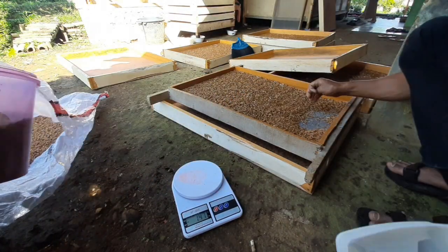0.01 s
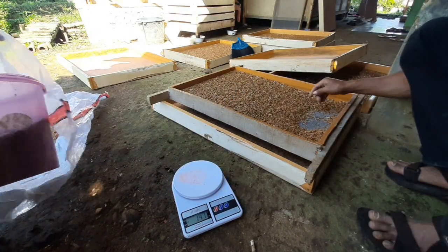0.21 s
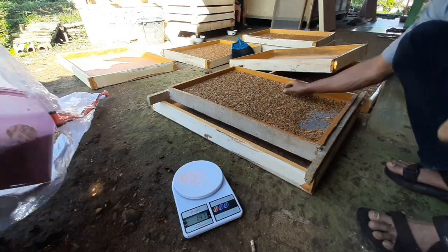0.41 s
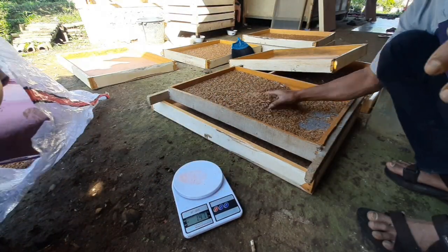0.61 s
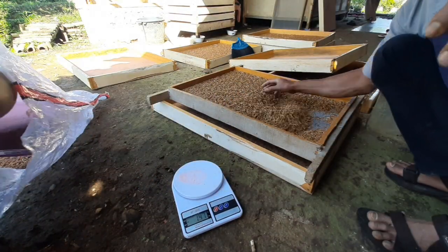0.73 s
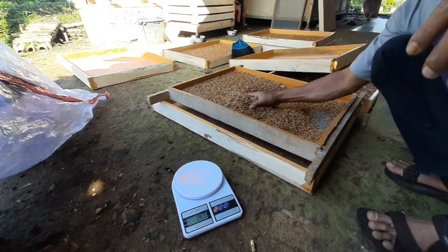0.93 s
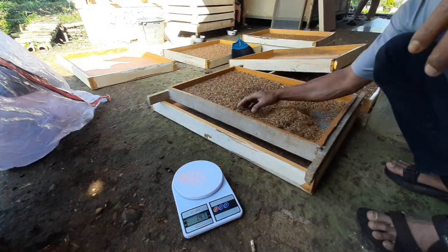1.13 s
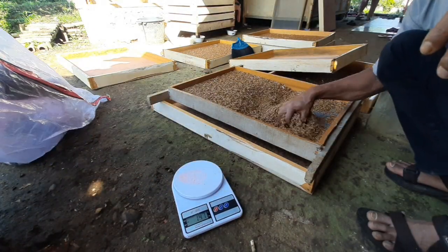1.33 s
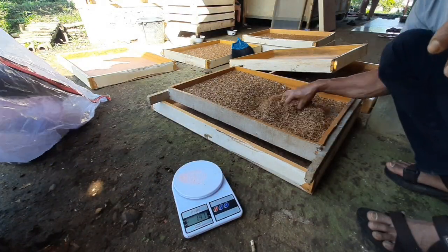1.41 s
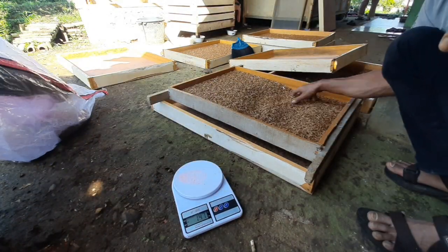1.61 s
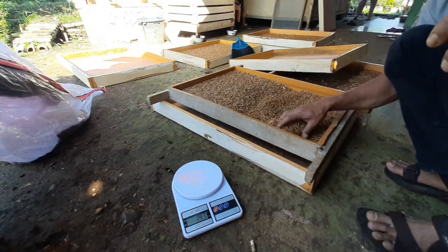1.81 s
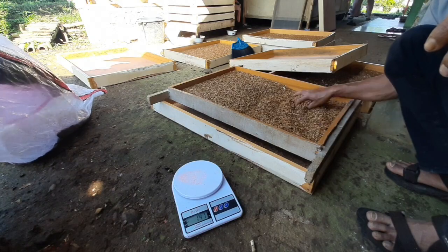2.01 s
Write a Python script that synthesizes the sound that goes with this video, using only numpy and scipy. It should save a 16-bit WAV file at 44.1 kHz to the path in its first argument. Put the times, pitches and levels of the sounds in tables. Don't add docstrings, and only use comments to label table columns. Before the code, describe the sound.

A plastic jug knocks hollowly on a bucket, then a hand rakes small worms in a tray

```python
import sys
import numpy as np
from scipy import signal
from scipy.fft import rfft, irfft
from scipy.io import wavfile
from scipy.ndimage import uniform_filter1d

SR = 44100
rng = np.random.default_rng(int(sys.argv[2]) if len(sys.argv) > 2 else 0)


def nominal_scale(level):
    x = np.asarray(level, float) / 20
    return 10 ** x


def waveform_to_disk(signal):
    frames = np.transpose(np.atleast_2d(signal))
    scaled = np.clip(frames, -1, 1) * 32767
    samples = np.round(scaled).astype(np.int16)
    wavfile.write(sys.argv[1], SR, samples)


N = 92610

# mode in Hz, level in dB, t60 in s, side of the blow [+-1].
BUCKET = [(194, -7, 0.086, 1), (284, 5.5, 0.068, 1), (401, 4, 0.094, -1), (450.5, 17.5, .065, 1),
          (513, 6.5, 0.12, 1), (606, 0.5, 0.046, -1)]
# mode in Hz, level in dB, t60 in s, side of the blow [+-1].
RIM = [(768, -11.5, 0.07, 1), (865, -19, .025, -1), (988, -11, 0.046, 1), (1141, -5, 0.035, -1),
       (1310, -19, .02, 1), (1443, -2, 0.024, 1), (1783, -8, 0.037, -1), (2140, -15, .03, 1),
       (2390, -14, .03, 1), (2950, -15, 0.03, -1), (3360, -9, 0.017, 1)]
# time in s, speed as hiss in dB, pressure on the tray in dB.
RAKE = [(0, -52.5, -44), (.15, -51, -50.5), (.3, -58.5, -39), (.345, -61, -52), (.5, -58.5, -53.5),
        (0.659, -54.5, -49), (.795, -63, -91), (.805, -85, -89), (.935, -74, -66), (.97, -58.5, -54),
        (1.1, -55, -55.5), (1.23, -47, -46), (1.29, -51, -52), (1.38, -52.5, -49), (1.644, -47.5, -48),
        (1.662, -53, -61), (1.76, -60.5, -51), (2.1, -56, -52.5)]


def evened(x):
    return x / np.sqrt(np.mean(x ** 2) + 1e-20)


def read(points, hz):
    f, value = np.transpose(points)
    return np.interp(np.log(hz + 1), np.log(f + 1), value)


def shaped(x, gain):
    return irfft(rfft(x) * gain(np.fft.rfftfreq(N, 1 / SR)), N)


def add(mix, s, sound):
    part = mix[..., round(s * SR):][..., :sound.shape[-1]]
    part += sound[..., :part.shape[-1]]


def resonate(x, hz, width):
    r = np.exp(-np.pi * width / SR)
    return evened(signal.lfilter([1, 0, -1], [1, -2 * r * np.cos(2 * np.pi * hz / SR), r * r], x))


def burst(t, start, length):
    rise, fall = 0.1, 0.22
    u = (t - start) / length
    return np.clip(u / rise, 0, 1) * np.clip((1 + fall - u) / (2 * fall), 0, 1) ** 2


def ring(modes, pitch, t):
    return sum(side * nominal_scale(db - 60 * t / t60) * np.sin(2 * np.pi * hz * pitch * t)
               for hz, db, t60, side in modes)


def contact(t):
    crack_db, crack_t60, snap_db, snap_ms = -14, 0.015, 3, 0.05
    noise = signal.lfilter([1], [1, -0.6], rng.standard_normal(len(t)))
    crack = nominal_scale(crack_db - 60 * t / crack_t60) * evened(noise)
    since = t * 1000 - 0.4
    snap = (1 - since / snap_ms) * np.exp(-np.maximum(since, 0) / snap_ms) * (since > 0)
    return crack + nominal_scale(snap_db) * snap


def knock(hollow, walls, db, wall_db, pitch, hard_hz):
    blow_ms, smear_db, wobble_db = 5.5, -8, -19
    t = np.arange(int(0.3 * SR)) / SR
    noise = rng.standard_normal((2, len(t)))
    rough = 1 + nominal_scale(smear_db) * evened(uniform_filter1d(noise[0], size=60))
    wobble = 1 + nominal_scale(wobble_db) * evened(uniform_filter1d(noise[1], size=300))
    swell = np.sin(np.pi / 2 * np.minimum(t * 1000 / blow_ms, 1)) ** 2
    wall = (rough * ring(walls, pitch, t) + contact(t)) * np.minimum(t * hard_hz / 3, 1)
    wall = signal.lfilter(*signal.butter(2, min(hard_hz, 15000), fs=SR), wall)
    return nominal_scale(db) * (0.5 * swell * wobble * ring(hollow, pitch, t) + nominal_scale(wall_db) * wall)


def jug_knocks():
    # start in s, level in dB, wall in dB, pitch factor, hardness in Hz.
    blows = [(.0005, -30.5, 0, 0.89, 1800), (.007, -45.5, 7.5, 1, 1600), (.0085, -30, 5.5, 0.61, 2200),
             (.2, -32, -11, 1.02, 990), (.214, -32, 8, 1.01, 1500), (0.2224, -8, 1.5, 1, 10400),
             (.244, -42, -22, 1.02, 1200), (0.424, -47, -2, 0.88, 800), (.481, -45, -16, 0.88, 800),
             (0.516, -40, -11, 1.26, 1270), (0.527, -33.5, 9, 1, 4000), (.544, -37, 7, 1.14, 1400),
             (0.553, -40, 9, 1.19, 1190)]
    # mode in Hz, level in dB, t60 in s, side of the blow [+-1].
    jug_hollow = [(160, -6, 0.14, 1), (252, -9, 0.089, -1), (343, -3, 0.094, 1), (399.3, .5, 0.12, -1),
                  (421, 6.5, 0.024, 1), (492.4, 6, 0.12, 1), (607, 3, 0.046, -1)]
    # mode in Hz, level in dB, t60 in s, side of the blow [+-1].
    jug_wall = [(796, -20.5, 0.07, 1), (880, -32, 0.17, -1), (1002, -2.5, 0.022, 1), (1194, -8.5, 0.02, 1),
                (1400, -7, 0.011, -1), (1700, -11.5, 0.03, 1), (2044, -15, 0.022, -1), (2265, -9, 0.038, 1),
                (2600, -17, 0.013, -1), (3190, -11, 0.015, 1)]
    out = np.zeros(N)
    for s, *blow in blows:
        add(out, s, knock(jug_hollow, jug_wall, *blow))
    return out


def ground_bumps():
    # start in s, tone in Hz, level in dB, length in s.
    weight_bumps = [(0.065, 66, -42, 0.052), (0.0289, 121, -42.5, 0.043), (0.18, 117, -41.5, 0.035),
                    (0.26, 99.6, -41.5, 0.045), (.17, 145, -34, 0.079), (0.28, 170, -37, 0.04),
                    (0.35, 85, -43, 0.05), (1.41, 115, -38, 0.068), (1.49, 113, -38.5, 0.045),
                    (1.984, 230, -33.5, 0.0064), (1.84, 131, -43.5, 0.066)]
    out = np.zeros(N)
    for s, hz, db, length in weight_bumps:
        t = np.arange(0, length, 1 / SR)
        add(out, s, nominal_scale(db) * np.sin(np.pi * t / length) * np.sin(2 * np.pi * hz * t))
    return out


def rim_drags():
    # start in s, length in s, level in dB.
    drags = [
        (.08, 0.067, -48),
        (.18, .042, -36),
        (0.259, 0.033, -41),
        (.335, .055, -47),
        (.418, .037, -43),
        (.455, 0.04, -48.5),
        (.52, .045, -40),
        (0.563, 0.023, -45),
    ]
    t = np.arange(N) / SR
    noise = rng.standard_normal(N)
    rub = evened(sum(nominal_scale(db) * resonate(noise, hz, 70) for hz, db, *_ in BUCKET + RIM))
    return rub * sum(nominal_scale(db) * burst(t, s, length) for s, length, db in drags)


def rim_rocks():
    # start in s, level in dB, wall in dB, pitch factor, hardness in Hz.
    rocks = [
        (0.3024, -35.5, 4, 1.06, 2500),
        (.3088, -21.5, -1, 1, 4000),
        (0.3124, -26, 4, 1.01, 3500),
        (0.3653, -43, 7, 1.1, 1800),
    ]
    out = np.zeros(N)
    for s, *blow in rocks:
        add(out, s, knock(BUCKET, RIM, *blow))
    return out


def shed_scatter(x):
    t = np.arange(int(0.2 * SR)) / SR
    tail = rng.standard_normal((2, len(t))) * nominal_scale(-60 * t / 0.05) * (t > 0.004)
    return nominal_scale(-14) * signal.fftconvolve(x[None], tail / np.linalg.norm(tail[0]), axes=1)[:, :N]


def jug():
    # frequency in Hz, left minus right in dB.
    jug_lean = [(60, -2.5), (450, 3), (800, -3.5), (2000, 4.5), (4500, 8), (10000, 3.5)]
    lag_s = 0.0002
    near = jug_knocks() + ground_bumps() + rim_drags() + rim_rocks()

    def port(k):
        return shaped(near, lambda hz: nominal_scale(k * read(jug_lean, hz)) * np.exp(-2j * np.pi * k * hz * lag_s))

    return np.array([port(0.49), port(-0.37)]) + shed_scatter(near)


def ports(a, b):
    # frequency in Hz, left-right likeness [0 to 1].
    likeness = [(60, 1), (170, 0.43), (350, 0.36), (600, 0.091), (1200, 0.072), (8000, 0.053)]
    # frequency in Hz, left minus right in dB.
    port_lean = [(60, -2), (250, 5), (550, -0.5), (1650, 1), (4000, 2.5), (10000, 1)]
    lead_s = 0.000242
    same = lambda hz: np.clip(read(likeness, hz), 0, 1)
    left = shaped(a, lambda hz: nominal_scale(read(port_lean, hz) / 2) * np.exp(2j * np.pi * hz * lead_s))
    right = shaped(a, same) + shaped(b, lambda hz: np.sqrt(1 - same(hz) ** 2))
    return np.array([left, shaped(right, lambda hz: nominal_scale(-read(port_lean, hz) / 2))])


def grains():
    per_s, size_db, share, flicker_db = 5000, -1.5, 0.59, 2
    size = nominal_scale(size_db * np.minimum(rng.exponential(1, N), 5)) * (rng.random(N) < per_s / SR)
    fine = rng.standard_normal((3, N))
    mix = share * evened(size * fine[0]) + (1 - share) * fine[1]
    return evened(mix) * nominal_scale(flicker_db * evened(uniform_filter1d(fine[2], size=500)))


def worm_hiss(g):
    # frequency in Hz, level in dB per Hz.
    worm_colour = [(290, -37), (500, 3.5), (1460, -1), (2650, -3.5), (4800, -8), (7100, -15.5),
                   (8700, -18.5), (12300, -14.5), (16000, -15.5)]
    return evened(shaped(g, lambda hz: nominal_scale(read(worm_colour, hz)) * (hz > 450) * np.minimum(hz / 700, 1) ** 2))


def tray_drum(g, t):
    # mode in Hz, width in Hz, level in dB.
    tray_modes = [(117, 8.3, -6), (235, 75, 4), (252, 38, 6), (321, 40, 13), (390, 104, 2.5),
                  (576, 45, -11), (1220, 130, -2), (2000, 360, -4), (2650, 85, -8.5), (3200, 400, -24)]
    # start in s, length in s, level in dB.
    thumps = [
        (1.135, 0.035, -50),
        (1.213, 0.042, -53.5),
        (1.386, 0.07, -40),
        (1.48, 0.064, -46.5),
        (1.845, 0.039, -55.5),
        (2.02, 0.079, -62),
    ]
    s, _, press_db = np.transpose(RAKE)
    tray = evened(sum(nominal_scale(db) * resonate(g, hz, w) for hz, w, db in tray_modes))
    press = nominal_scale(np.interp(t, s, press_db))
    return tray * (press + sum(nominal_scale(db) * burst(t, start, length) for start, length, db in thumps))


def slips(hiss, t):
    # start in s, level in dB, length in s, brightness in Hz.
    sudden = [(0.027, -55.5, 0.07, 1960), (0.113, -50, 0.025, 800), (0.24, -53, 0.066, 3050),
              (0.402, -48, 0.0075, 4400), (.5175, -50, 0.0025, 6000), (0.558, -48, 0.011, 3900),
              (0.602, -50.5, 0.053, 736), (.7, -66, 0.11, 5930), (0.995, -49.5, 0.0031, 5770),
              (1.02, -61, 0.079, 4730), (1.14, -67, 0.028, 800), (1.391, -51.5, 0.11, 915),
              (1.505, -61.5, 0.074, 900), (1.552, -53.5, 0.075, 800), (1.774, -53, 0.061, 1000),
              (1.831, -52, 0.048, 660), (1.924, -43.5, 0.0035, 4500), (1.928, -53, 0.021, 2000),
              (1.983, -45.5, 0.01, 895), (2.007, -54, 0.0032, 2000), (1.997, -52.5, 0.071, 686)]
    out = np.zeros(N)
    for start, db, length, hz in sudden:
        near = slice(int(start * SR), int((start + 2 * length) * SR) + 9)
        bright = signal.lfilter(*signal.butter(2, min(hz, 15000), "high", fs=SR), hiss[near])
        out[near] += nominal_scale(db) * burst(t[near], start, length) * evened(bright)
    return out


def nail_scrapes(g, t):
    # start in s, length in s, level in dB, ring in Hz.
    scrapes = [
        (1.388, 0.011, -45.5, 2600),
        (1.426, 0.048, -50, 2650),
        (1.428, 0.036, -51, 1920),
        (1.513, 0.04, -54, 2720),
        (1.502, 0.054, -54, 2150),
        (1.56, 0.06, -50, 3200),
        (1.563, 0.044, -51.5, 1950),
        (1.565, 0.078, -53.5, 1220),
        (1.603, 0.044, -53, 2600),
    ]
    return sum(nominal_scale(db) * burst(t, s, length) * resonate(g, hz, 200) for s, length, db, hz in scrapes)


def rake():
    t = np.arange(N) / SR
    s, speed_db, _ = np.transpose(RAKE)
    speed = nominal_scale(np.interp(t, s, speed_db) + 3)
    out = []
    for _ in range(2):
        g = grains()
        hiss = worm_hiss(g)
        out.append(hiss * speed + slips(hiss, t) + tray_drum(g, t) + nail_scrapes(g, t))
    return ports(*out)


def yard():
    # frequency in Hz, level in dB per Hz.
    floor_colour = [(25, -23), (50, -22), (150, -8.5), (300, -23.5), (500, -46), (2500, -36.5),
                    (7000, -43.5), (16000, -49)]
    # hum in Hz, width in Hz, level in dB.
    machine = [(50, 24, -58.5), (80, 12, -71), (122.2, 22, -54.5), (175, 4, -72.5), (258.3, 6.2, -56),
               (336, 18, -70.5), (436, 2.1, -78), (584, 17, -78)]
    air = rng.standard_normal((2, N))
    floor = shaped(air, lambda hz: nominal_scale(read(floor_colour, hz)) * np.minimum(hz / 45, 1) ** 4)
    top = shaped(floor, lambda hz: hz > 400)
    hum = [sum(nominal_scale(db) * resonate(v, hz, w) for hz, w, db in machine) for v in air]
    return ports(*(nominal_scale(-66) * floor / np.std(top) + hum))


def scene():
    return jug() + rake() + yard()


def roll_off(x):
    return signal.sosfilt(signal.butter(12, 16600, fs=SR, output="sos"), x)


def record(dry):
    # bump in Hz, width in Hz, level in dB.
    mic_bumps = [(7360, 1540, 9.5), (8900, 250, -0.5), (11700, 2670, 6.5)]
    low_cut_hz, top_hz, top_db = 40, 15850, -30

    def colour(hz):
        db = sum(d * np.exp(-((hz - f) / w) ** 2) for f, w, d in mic_bumps) + top_db * (hz > top_hz)
        return nominal_scale(db) / np.sqrt(1 + (low_cut_hz / (hz + 1)) ** 8)

    return roll_off(shaped(dry, colour))


dry = scene()
out = record(dry)
waveform_to_disk(out)
```